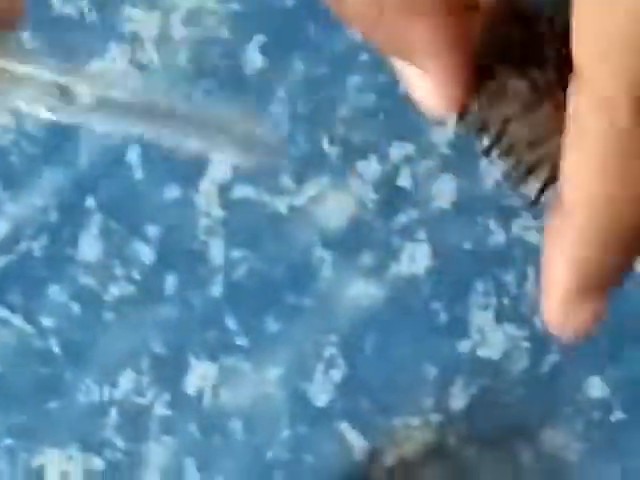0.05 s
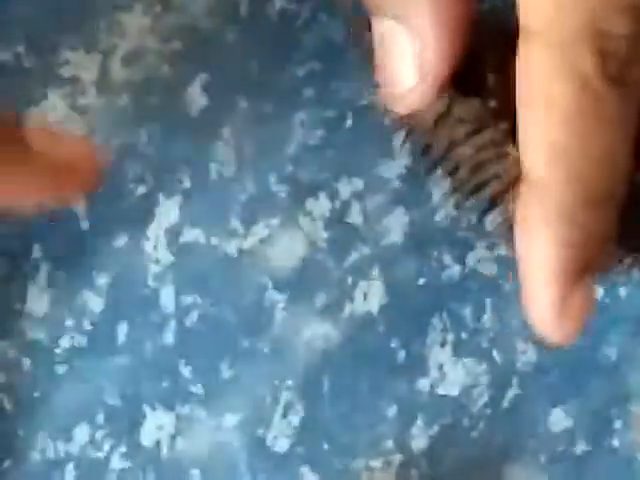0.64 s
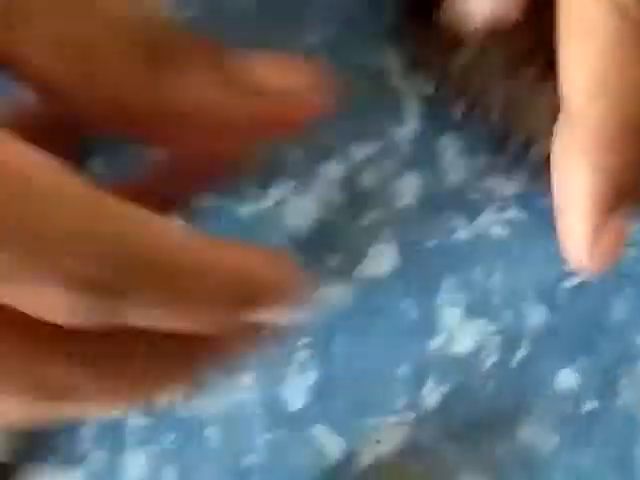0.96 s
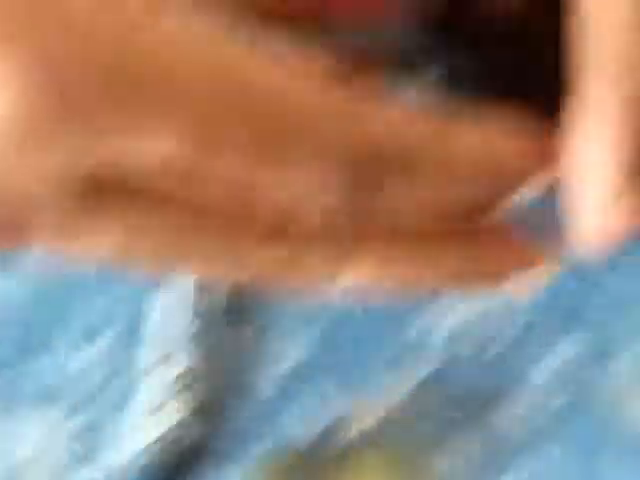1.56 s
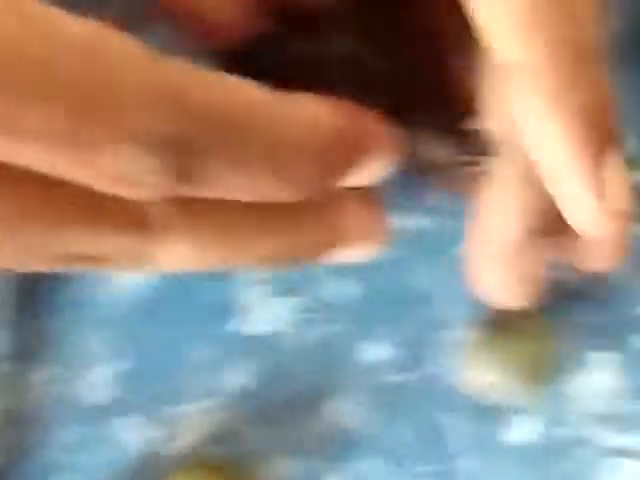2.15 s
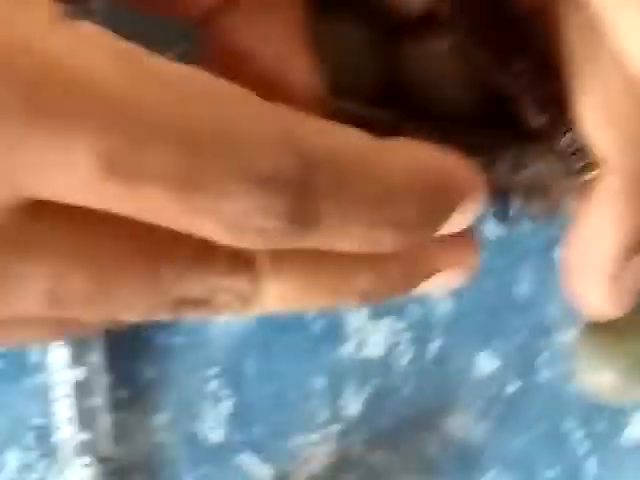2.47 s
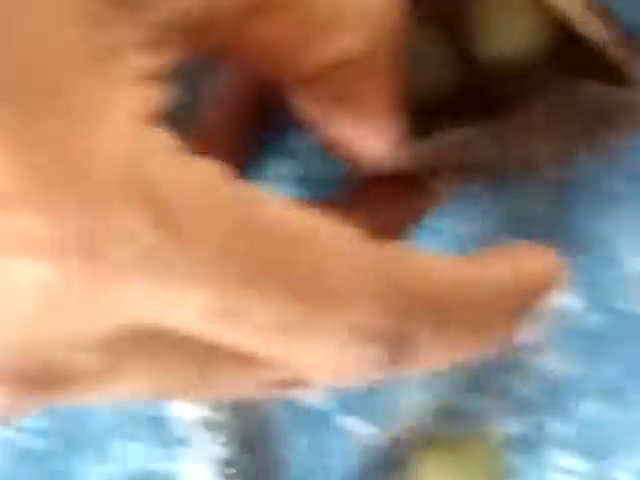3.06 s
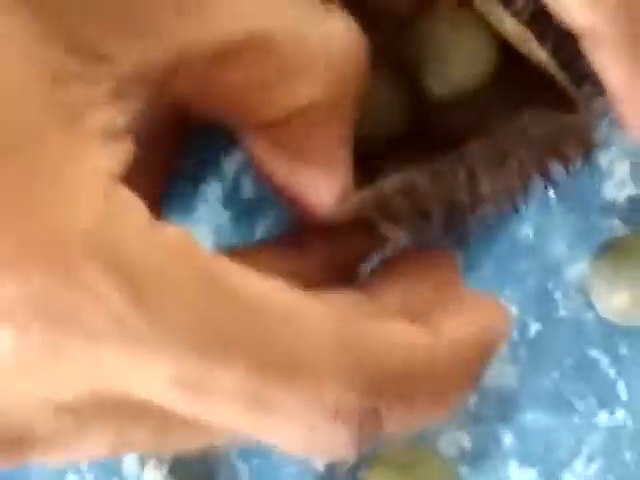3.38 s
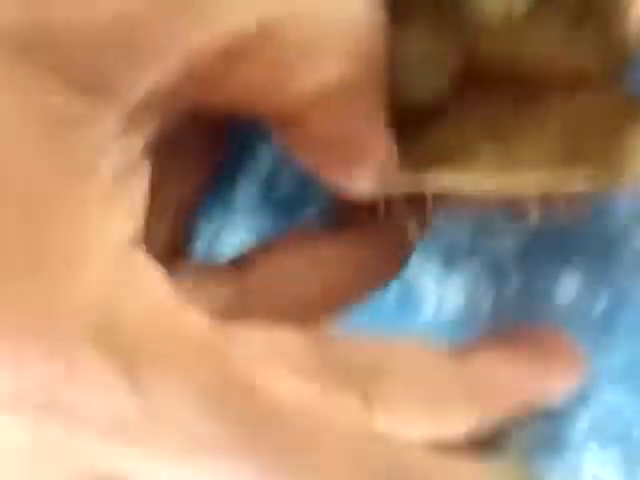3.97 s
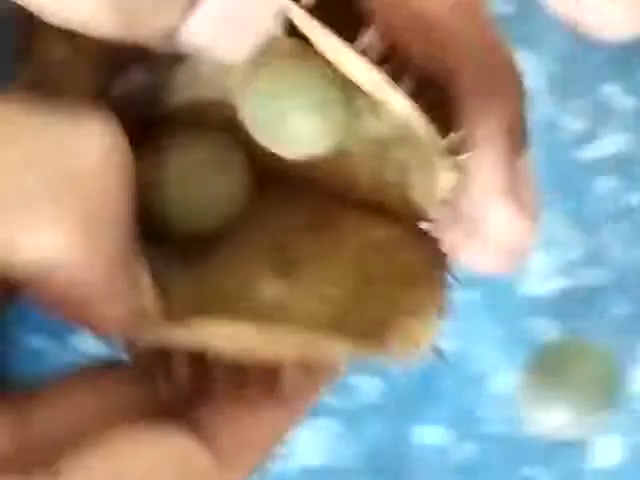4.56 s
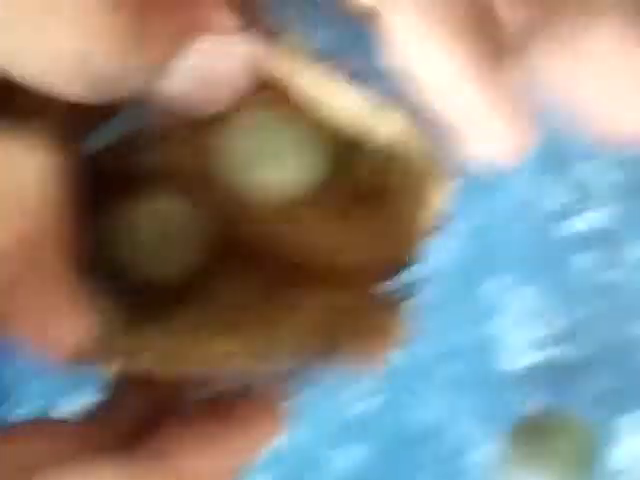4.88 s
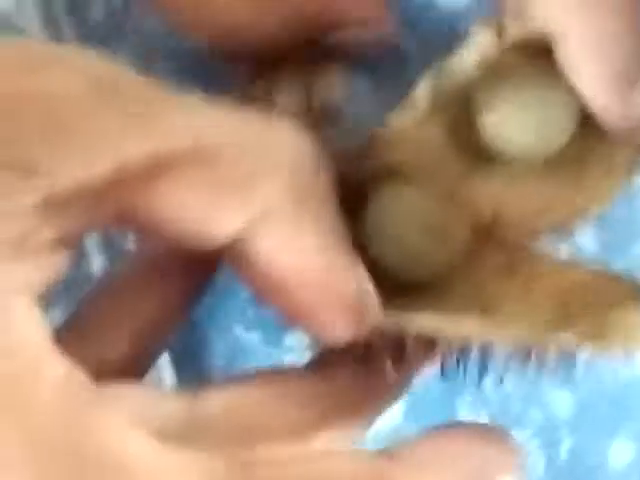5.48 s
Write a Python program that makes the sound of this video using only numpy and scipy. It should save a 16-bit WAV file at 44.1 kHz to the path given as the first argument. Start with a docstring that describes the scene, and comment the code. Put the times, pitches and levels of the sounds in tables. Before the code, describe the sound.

Fingertips brush a dry, spiny seed pod close to the microphone, making a light bristly rustle and tiny high pings. As the pod is pried open, small sharp snaps come more often and the seam gives brief rips, with one stronger crack past the middle. A fan rushes steadily behind, and soft low gusts buffet the microphone. The snaps echo briefly in a hard room.

```python
"""Over the steady rush of a fan, fingertips brush a dry, spiny seed pod and a few spines twang free.
The pod is on a table in a hard room, close to a small microphone. As the fingers pry it open, fibres
rustle, the seam rips, and the husk gives way in short snaps that ring its wall and echo briefly.
The fan stands behind; its draught buffets the microphone as the hands move."""
import sys
import numpy as np
from scipy import signal
from scipy.fft import rfft, irfft
from scipy.io import wavfile

SR = 44100
rng = np.random.default_rng(int(sys.argv[2]) if len(sys.argv) > 2 else 0)


def waveform_to_disk(signal):
    """Save audio, clipped to [-1, 1], as 16-bit WAV at the path in sys.argv[1]."""
    frames = np.transpose(np.atleast_2d(signal))
    scaled = np.clip(frames, -1, 1) * 32767
    samples = np.round(scaled).astype(np.int16)
    wavfile.write(sys.argv[1], SR, samples)


N = 243671

# The fan's rush, behind the table. Each row: frequency in Hz, relative level in dB.
FAN_SPECTRUM = [(20, 2.5), (100, -5), (175, 1.5), (300, -7), (500, -8), (750, -9), (1200, -9.5),
                (2100, -17.5), (3000, -21), (4200, -31.5), (6000, -43.5), (9000, -56.5), (12000, -66),
                (16000, -73)]
# Resonances in that rush. Each row: centre in Hz, width in Hz, lift in dB.
FAN_HUMPS = [(182, 106, 0.5), (394, 110, 2.5), (620, 116, 6), (799, 24, 2.5), (925, 29, 3.5)]
# Air on the microphone, deep swell and higher flutter. Each row: frequency in Hz, relative level in dB.
SWELL_SPECTRUM = [(8, -3), (20, 2), (45, -1.5), (95, -7), (140, -16.5), (300, -44), (1200, -120)]
FLUTTER_SPECTRUM = [(60, -10), (110, 0.5), (170, -3), (260, -10), (400, -14.5), (800, -29.5), (3000, -120)]
# The draught between gusts. Each row: time in seconds, relative swell and flutter levels in dB.
BREEZE_LEVELS = [(0, -48, -38.5), (.85, -47, -51), (1.1, -36, -45.5), (1.45, -39, -40.5), (2.1, -35.5, -41),
                 (2.8, -35.5, -40), (2.93, -45, -47), (3.15, -36.5, -41.5), (4.2, -35, -38.5),
                 (4.65, -35.5, -42), (4.9, -34, -42.5), (5.53, -37.5, -41.5)]
# Gusts from the moving hands. Each row: peak time and length in seconds, relative levels in dB of
# swell, flutter and the core's pressure dip, pitch of that dip in Hz.
HAND_GUSTS = [(1.101, 0.049, -35, -39, -21.5, 35), (1.487, 0.063, -28, -34.5, -17.5, 39.8),
              (1.564, 0.018, -25, -35, -30, 60), (1.659, 0.029, -24.5, -26, -15.5, 128),
              (1.781, 0.026, -27.5, -36, -30, 50), (1.938, .03, -27.5, -37, -28, 45),
              (2.526, 0.044, -22, -36.5, -33, 44.7), (2.634, 0.015, -27, -43, -32, 60),
              (3.005, .018, -27, -26, -17.5, 101), (3.1, 0.082, -31.5, -36.5, -34, 80),
              (3.395, 0.023, -22, -27.5, -31, 38), (3.481, 0.019, -26, -33, -20.5, 70),
              (3.623, 0.027, -25, -36, -42, 100), (3.698, .022, -25, -34.5, -13, 108),
              (3.892, 0.021, -29.5, -34.5, -23, 60), (4.01, 0.028, -31, -32.5, -28, 70),
              (4.316, .045, -26.5, -32.5, -13, 60), (4.548, 0.018, -22.5, -29.5, -13.5, 161),
              (4.776, 0.015, -31, -19.5, -15.5, 130), (5.04, 0.026, -29, -32.5, -18.5, 109),
              (5.231, 0.011, -41, -28.5, -19, 129), (5.38, 0.034, -27, -33, -21, 50),
              (5.514, 0.022, -24.5, -50, -26.5, 54)]
# The hard room's decay. Each row: frequency in Hz, seconds to fall 60 dB.
ROOM_DECAY = [(1000, 0.83), (3500, 0.35), (8000, 0.32), (15000, 0.29)]
# The bristly rustle of spines, with a faint top-treble lift from the microphone chain.
# Each row: frequency in Hz, relative level in dB.
RUSTLE_SPECTRUM = [(2000, 3.5), (3000, 4), (4100, 2.5), (5000, -8.5), (6300, -10), (7400, -13), (9000, -16),
                   (10500, -25), (12200, -27.5), (14800, -24)]
# The tearing seam. Each row: frequency in Hz, relative level in dB.
SEAM_SPECTRUM = [(1800, -20), (2300, 3), (3000, 6.5), (3600, 14), (4300, -30), (5100, -12), (5700, 0.5),
                 (6400, -24), (7500, -24)]
# Finger strokes over the spines. Each row: peak time and length in seconds, relative level in dB.
FINGER_STROKES = [(.11, 0.045, -48), (.27, 0.09, -48), (.6, 0.065, -52), (1.17, 0.17, -56),
                  (2.4, 0.23, -64), (2.71, 0.057, -57), (2.85, 0.082, -46), (3.12, 0.052, -48),
                  (3.58, 0.037, -51), (3.94, 0.029, -43), (4.02, 0.043, -46.5), (4.2, 0.041, -48),
                  (4.84, 0.034, -54), (5.24, 0.064, -46.5), (5.44, 0.062, -48.5)]
# Rips along the seam. Each row: start and length in seconds, level in dB.
SEAM_RIPS = [(0.715, 0.046, -41), (2.73, 0.083, -61), (2.884, 0.1, -45), (3.102, 0.025, -51),
             (3.924, 0.038, -31.5), (4.526, 0.025, -45.5), (5.417, .035, -59)]
# Spines flicking free. Each row: start in seconds, pitch in Hz, level in dB, seconds to fall 60 dB.
SPINE_TWANGS = [(0.251, 7300, -38, 0.014), (0.37, 3210, -23, 0.018), (0.367, 6050, -36, 0.013),
                (2.052, 11100, -56, 0.022), (2.052, 7560, -49, .02), (0.946, 3890, -39, .01),
                (1.546, 5360, -37.5, .012), (2.2394, 6860, -34, 0.0083), (2.9, 4900, -35, 0.011),
                (4.171, 5470, -26, 0.0085), (4.251, 4170, -33, 0.0045), (2.757, 3730, -16, 0.01),
                (2.917, 3050, -24.5, 0.017), (3.21, 8950, -44, 0.0094), (3.211, 4240, -32, 0.0066),
                (3.827, 4360, -28.5, 0.013), (4.171, 7450, -39, 0.014)]
# Snaps of the husk. Each row: start in seconds, relative ring level in dB, ring pitch in Hz,
# relative splinter level in dB, hollowness as a gain, send to the room in dB.
HUSK_SNAPS = [(0.503, -58, 3280, -63, 0, -5), (0.7009, -25.5, 3400, -61, 0.59, -2),
              (0.7278, -37, 3620, -82, 1.1, -2), (0.8509, -44.5, 3180, -71, 0.55, 1.5),
              (0.9451, -41, 3870, -58, 0, -0.5), (1.1889, -44, 4200, -68, 0.41, -10),
              (1.196, -44, 3650, -88, 1.6, 0.5), (1.544, -37, 3900, -82, 0, -10),
              (1.564, -52, 3400, -61, 0.5, -3), (2.0514, -50, 4020, -60, 0.09, -1),
              (2.24, -45.5, 3500, -68, 0, -8), (2.339, -42.5, 3650, -54.5, 0, -3.5),
              (2.3736, -34, 3750, -61, 0, -6.5), (2.5174, -48.5, 3780, -52.5, 0, -3),
              (2.6143, -43, 3730, -67, 0.24, 0.5), (2.683, -37.5, 4470, -59, 0, -1),
              (2.705, -45, 3680, -54.5, 0, -7), (2.7491, -35.5, 3830, -61, 0.092, -18),
              (2.7936, -42, 3450, -53, 0.18, -11), (2.8737, -42, 3750, -54.5, 0, -1),
              (3.0491, -27, 3600, -46.5, 0, -7), (3.0653, -37, 3200, -65, 0, -7),
              (3.095, -30.5, 3680, -53, 0.17, -1.5), (3.103, -30, 3780, -51, 0.23, -21),
              (3.1074, -31, 3520, -48, 0, -21), (3.2633, -32.5, 3800, -60, 0.055, -8),
              (3.4734, -31, 3530, -47.5, 0.021, -6.5), (3.5714, -37.5, 3730, -46, 0.13, -8.5),
              (3.639, -46, 4060, -59, 0, -14), (3.8108, -51, 4200, -55, 0.15, -5),
              (3.8978, -30, 3480, -43, 0.29, 2), (3.914, -14, 3590, -40.5, 0.16, -10),
              (3.9602, -30.5, 3570, -50, 0.28, -5), (4.0114, -32.5, 3830, -48.5, 0.16, -18),
              (4.171, -31, 3770, -59, 0, -10), (4.1886, -41, 5130, -64, 0, -16),
              (4.291, -38.5, 3490, -55.5, 0, -9), (4.433, -43, 3500, -66, 0, -7),
              (4.5224, -26, 3740, -62, 0, -18), (4.523, -33, 2850, -70, 0.19, -6),
              (4.7922, -41, 4910, -73, 0, -3), (4.809, -36, 3740, -54, 0.082, 0),
              (4.8153, -37, 4080, -71, 0, -12), (4.8322, -35, 3500, -53.5, 0.42, -7),
              (5.1855, -41.5, 3230, -74, 1, -16), (5.252, -32, 3620, -52.5, 0.6, -5.5),
              (5.381, -43, 3500, -58, 0.77, -13), (5.418, -22.5, 3570, -49.5, 0.1, -10)]

UPPER_RATIO, UPPER_SCATTER = 1.484, 0.023   # the wall's second mode over its first; spread between snaps
UPPER_DB, UPPER_FOLLOWS = -6, 0.33   # that mode against the ring; how far it follows the splinters
KNOCK_UPPER_DB, KNOCK_FULL = 9.5, 0.86   # a hollow knock lifts that mode, fully from this hollowness on


def from_db(db):
    """Decibels to gain."""
    return 10 ** (np.asarray(db) / 20)


def rms_one(x):
    """Scale to rms 1."""
    return x / np.sqrt(np.mean(x ** 2) + 1e-20)


def in_time(rows):
    """The columns of a curve, sample by sample."""
    times, *columns = np.transpose(rows)
    return [np.interp(np.arange(N) / SR, times, column) for column in columns]


def at_hz(points, hz):
    """Read a table on a log-frequency axis."""
    f, value = np.transpose(points)
    return np.interp(np.log(np.maximum(hz, 1)), np.log(f), value)


def band(x, low_hz, high_hz, order=2):
    """Causal band-pass."""
    sos = signal.butter(order, [low_hz, min(high_hz, .45 * SR)], "band", fs=SR, output="sos")
    return signal.sosfilt(sos, x)


def resonate(x, hz, width_hz):
    """One resonance with gain 1 at its peak."""
    r = np.exp(-np.pi * width_hz / SR)
    feedback = [1, -2 * r * np.cos(2 * np.pi * hz / SR), r * r]
    return signal.lfilter(np.array([1, 0, -1]) * (1 - r * r) / 2, feedback, x + 1e-18)


def add(track, s, sound):
    """Mix a sound into a track at s seconds."""
    start = max(round(s * SR), 0)
    track[start:start + len(sound)] += sound[:max(N - start, 0)]


def noise(spectrum, humps=()):
    """Steady noise with a broad colour and optional humps; rms 1."""
    hz = np.arange(N // 2 + 1) * SR / N
    lift_db = sum(db / (1 + (2 * (hz - f) / width) ** 2) for f, width, db in humps)
    return rms_one(irfft(rfft(rng.standard_normal(N)) * from_db(at_hz(spectrum, hz) + lift_db), N))


def swells(rows, rise):
    """Summed power of bumps (peak s, length s, dB) whose rise lasts `rise` times their fall."""
    t, power = np.arange(N) / SR, np.zeros(N)
    for s, length, db in rows:
        offset = (t - s) / (length * np.where(t < s, rise, 1))
        power += from_db(db) ** 2 * np.exp(-np.minimum(offset ** 2, 50))
    return power


def grains(spectrum, per_s, spread_db, width_hz, count=28):
    """Tiny ticks of uneven size, each dealt to one fibre that rings briefly at its own pitch; rms 1."""
    ticks = (rng.random(N) < per_s / SR) * rng.choice([-1, 1], N)
    ticks = ticks * from_db(spread_db * np.minimum(rng.exponential(1, N), 3))
    dealt, out = rng.integers(0, count, N), np.zeros(N)
    for k, hz in enumerate(np.linspace(spectrum[0][0], spectrum[-1][0], count)):
        fibre = band(ticks * (dealt == k) + 1e-18, hz - min(width_hz, hz) / 2, hz + width_hz / 2)
        out += from_db(at_hz(spectrum, hz)) * fibre
    return rms_one(out)


def fan(level_db=-37):
    """Behind the table, a fan pushes air: a steady rush with a few resonances."""
    return from_db(level_db) * noise(FAN_SPECTRUM, FAN_HUMPS)


def draught(swell_db=-1.0, flutter_db=-2.0, calm_db=-42, dip_db=-1.5, rise=1.25, flutter_share=0.74):
    """Eddies press on the microphone; each gust swells, flutters and has a pressure dip at its core."""
    breeze, stir = from_db(in_time(BREEZE_LEVELS))
    gust_swells = [(s, length, db) for s, length, db, *_ in HAND_GUSTS]
    gust_flutters = [(s, length * flutter_share, db) for s, length, _, db, *_ in HAND_GUSTS]
    swell = np.sqrt(breeze ** 2 + swells(gust_swells, rise))
    flutter_power = stir ** 2 + swells(gust_flutters, rise)
    flutter = np.sqrt(np.maximum(flutter_power - from_db(calm_db) ** 2, 0))   # none in gentle air
    out = from_db(swell_db) * swell * noise(SWELL_SPECTRUM)
    out += from_db(flutter_db) * flutter * noise(FLUTTER_SPECTRUM)
    t = np.arange(-SR // 10, SR // 10) / SR
    for s, *_, db, hz in HAND_GUSTS:
        across = (2 * np.pi * hz * t / 1.68) ** 2   # squared distance from the eddy's core
        add(out, s + t[0], -from_db(db + dip_db) * (1 - across) / (1 + across) ** 2)
    return out


def room(x, delay_s=0.003, build_s=0.0021, wander_hz=2.3):
    """Echoes off the hard walls swell after a short gap and die faster in the treble."""
    t = np.arange(SR // 2) / SR
    edges_hz = np.geomspace(500, 18000, 11)
    tails = np.zeros((2, len(t)))
    for low, high in zip(edges_hz, edges_hz[1:]):
        t60 = at_hz(ROOM_DECAY, np.sqrt(low * high))
        tails += band(rng.standard_normal(tails.shape), low, high, order=3) * from_db(-60 * t / t60)
    onset = 1 - np.exp(-np.maximum(t - delay_s, 0) / build_s)
    tails = rms_one(tails * onset) / np.sqrt(len(t))
    # the echo pattern shifts as the hands move: a steady crossfade between two tails
    angle = 2 * np.pi * wander_hz * np.arange(N) / SR
    shares = np.cos(angle), np.sin(angle)
    return sum(signal.fftconvolve(x * share, tail)[:N] for share, tail in zip(shares, tails))


def rubbing(resting_db=-68.5):
    """How hard the fingers rub, as a gain: strokes over a light hold."""
    return np.sqrt(swells(FINGER_STROKES, rise=0.87) + from_db(resting_db) ** 2)


def rustle():
    """Spines slip under the fingertips one after another."""
    return grains(RUSTLE_SPECTRUM, per_s=3200, spread_db=11.0, width_hz=420) * rubbing()


def rips():
    """Fibres of the seam part in a dense run that starts sharply and fades."""
    envelope = np.zeros(N)
    for s, length, db in SEAM_RIPS:
        age = np.arange(SR // 3) / SR / length
        add(envelope, s, from_db(db) * (1 - np.exp(-10 * age)) * np.exp(-age ** 2))
    return envelope * grains(SEAM_SPECTRUM, per_s=3000, spread_db=6.0, width_hz=620)


def twangs(slip_s=0.00016):
    """A stiff spine slips off the skin and rings at one pitch."""
    t, out = np.arange(SR // 10) / SR, np.zeros(N)
    for s, hz, db, t60 in SPINE_TWANGS:
        envelope = (1 - np.exp(-t / slip_s)) * from_db(db - 60 * t / t60)
        add(out, s, np.sin(2 * np.pi * hz * t) * envelope)
    return out


def faint_ticks(peak_per_s=45, db=-53, hz=4100, chip_db=-70.5, spread_db=2.0, send_db=-3, tries=320):
    """Small fibres give way at random, more often under a stroke; rows as in HUSK_SNAPS."""
    chances, scatter = rng.random((tries, 2)), rng.standard_normal((tries, 3))
    rub = rubbing()
    odds = peak_per_s * rub / rub.max() * N / SR / tries
    return [(when * N / SR, db + spread_db * louder, hz * np.exp(0.089 * higher),
             chip_db + spread_db * sharper, 0, send_db)
            for (when, luck), (louder, higher, sharper) in zip(chances, scatter)
            if luck < odds[int(when * N)]]


def lead_in_ticks(lead_s=.004, ring_drop_db=26, chip_drop_db=20):
    """A faint lead-in tick just before each snap softens its attack; rows as in HUSK_SNAPS."""
    draws = rng.uniform(0, 2, (len(HUSK_SNAPS), 2))
    return [(s - lead_s * (1 + early) / 2, db - ring_drop_db, hz * (1 + 0.34 * (higher - 1)),
             chip_db - chip_drop_db, 0, send_db)
            for (s, db, hz, chip_db, _, send_db), (early, higher) in zip(HUSK_SNAPS, draws)]


def snaps(ring_s=0.0029, glide=0.13, glide_s=0.00027, tear_s=0.0017, tear_db=-12, even_db=-36,
          purity_per_db=-1.0, clatter=.7, wall_db=-0.5, body_db=2.5, splinter_db=1.5, shell_db=-1.8):
    """A fibre breaks, its neighbours tear and the husk rings; returns close sound and room send."""
    t = np.arange(round(.02 * SR)) / SR
    direct, sent = np.zeros(N), np.zeros(N)

    def at_level(x, db, held_s=.005):
        """Give a burst the energy of db rms held for held_s."""
        return rms_one(x) * from_db(db) * np.sqrt(held_s / t[-1])

    for s, db, hz, chip_db, hollowness, send_db in HUSK_SNAPS + lead_in_ticks() + faint_ticks():
        tear = from_db(tear_db) * rng.standard_normal((6, len(t))) * np.exp(-t / tear_s)
        force = tear + (t == 0)
        # short bending waves arrive first, so the pitch sinks; the fingers choke the ring
        turns = np.cumsum(hz * (1 + glide * np.exp(-t / glide_s))) / SR
        choked = (1 - np.exp(-t * hz * 2)) * np.exp(-(t / ring_s) ** 2)
        ring = at_level(np.sin(2 * np.pi * turns) * choked, db)
        shell = at_level(band(force[0], hz * 0.735, hz * 1.17, order=3), db)   # the crowd of other modes
        # a more splintery break drives the upper mode harder
        upper_hz = hz * UPPER_RATIO * (1 + UPPER_SCATTER * rng.standard_normal())
        knock_db = KNOCK_UPPER_DB * min(hollowness / KNOCK_FULL, 1)
        upper_db = db + UPPER_DB + UPPER_FOLLOWS * (chip_db - db) + knock_db
        upper = resonate(force[1], upper_hz, width_hz=700) + 0.27 * force[2]
        upper = at_level(band(upper, 5290, 8040, order=3), upper_db)
        hollow = hollowness * at_level(band(force[3], 1100, 2600), db + body_db)
        chips = tear[4:] * (1 - np.exp(-t / 0.00026))   # splinters part as the crack spreads
        splinters = band(chips[0], 7100, 10300) + 0.33 * band(chips[1], 11800, 16500)
        edge = upper + hollow + at_level(splinters, chip_db + splinter_db)
        # weak snaps ring almost purely; hard or hollow ones have more clatter
        purity = np.clip(.5 + purity_per_db * (db - even_db) - clatter * hollowness, .3, .94)
        wall = at_level(np.sqrt(purity) * ring + np.sqrt(1 - purity) * shell, db + wall_db)
        add(direct, s, wall + edge)
        # the microphone faces one wall of the pod; the room hears the whole shell
        add(sent, s, (from_db(shell_db) * shell + edge) * from_db(send_db))
    return direct, sent


def scene(snap_room_db=-4.0, twang_room_db=-10, rustle_db=-5.0, fibre_room_db=-3):
    """One microphone at the table: the pod close up, with room, fan and draught around it."""
    air = fan() + draught()
    pings = twangs()
    fibres = from_db(rustle_db) * rustle() + rips()
    cracks, sent = snaps()
    echoes = room(from_db(snap_room_db) * sent + from_db(twang_room_db) * pings
                  + from_db(fibre_room_db) * fibres)
    return (cracks + pings + fibres + echoes + air)[None]


def record(dry, cutoff_hz=15800):
    """The top of the microphone's signal is cut steeply."""
    return signal.sosfilt(signal.ellip(10, .2, 80, cutoff_hz, fs=SR, output="sos"), dry)


dry = scene()
out = record(dry)
waveform_to_disk(out)
```